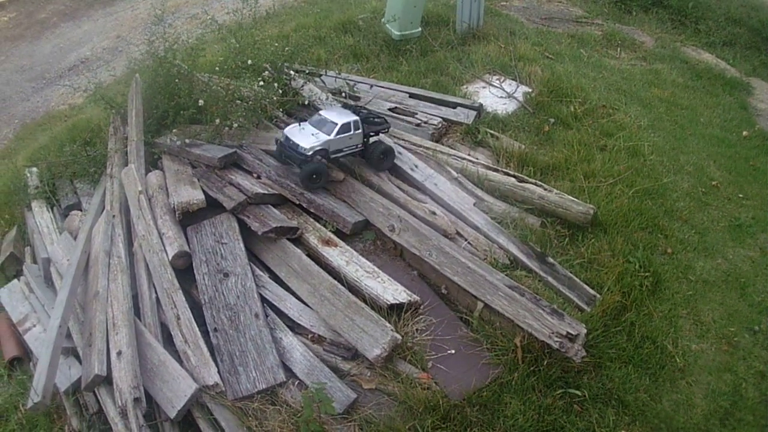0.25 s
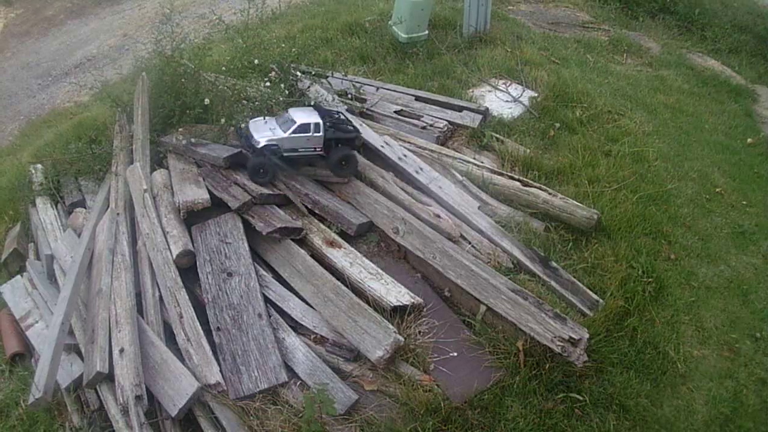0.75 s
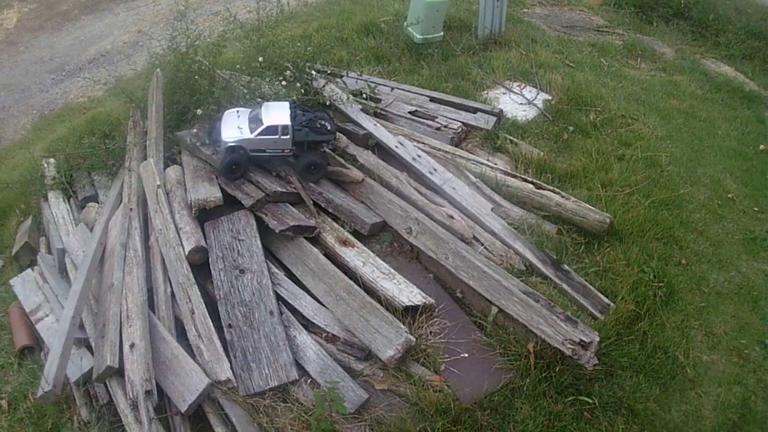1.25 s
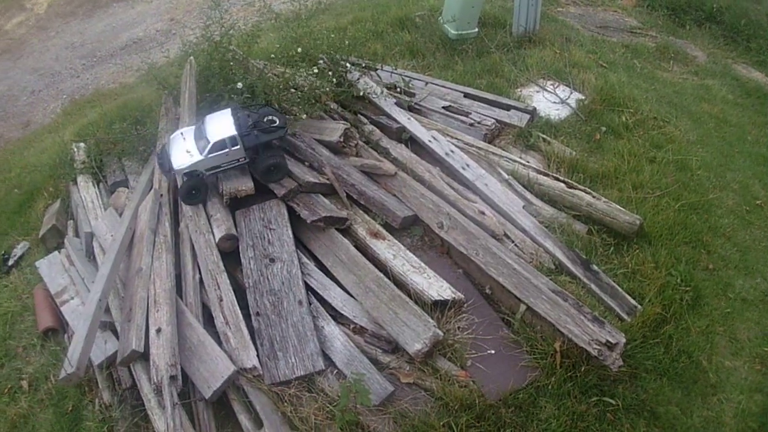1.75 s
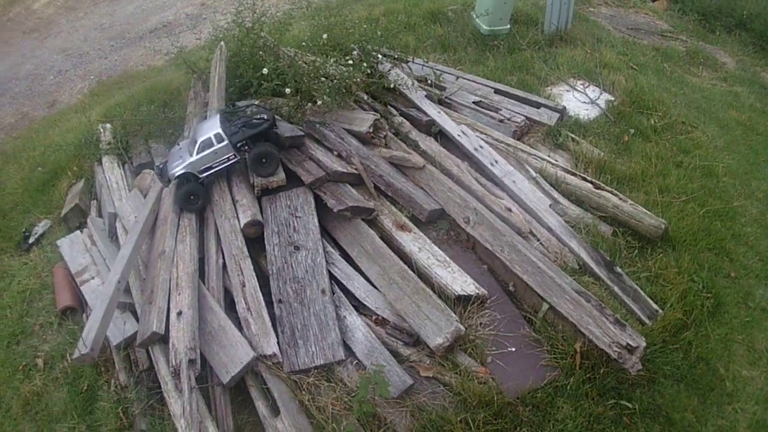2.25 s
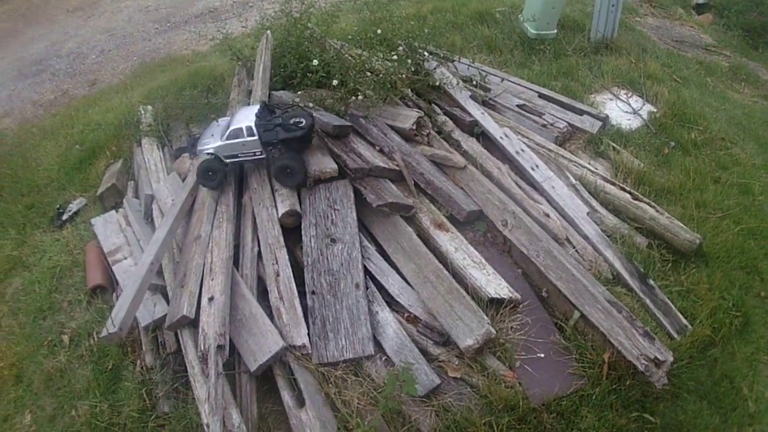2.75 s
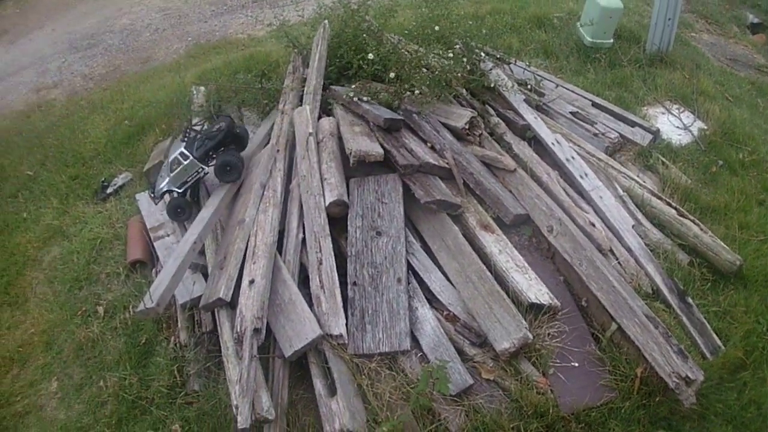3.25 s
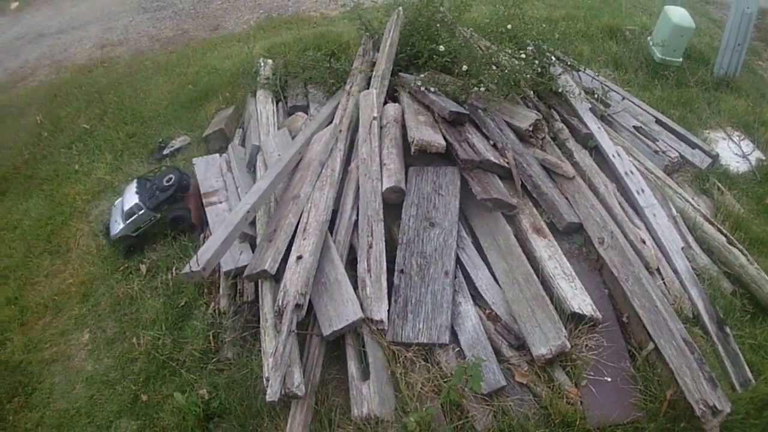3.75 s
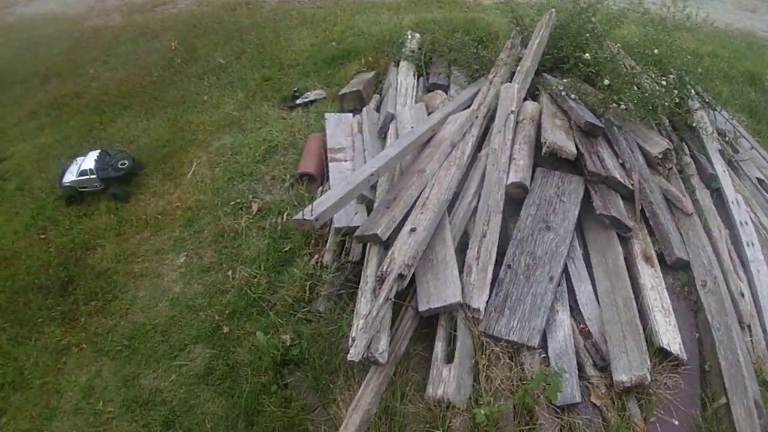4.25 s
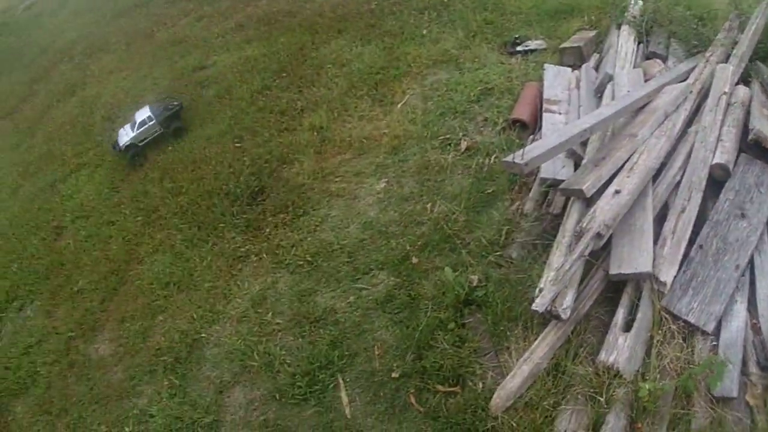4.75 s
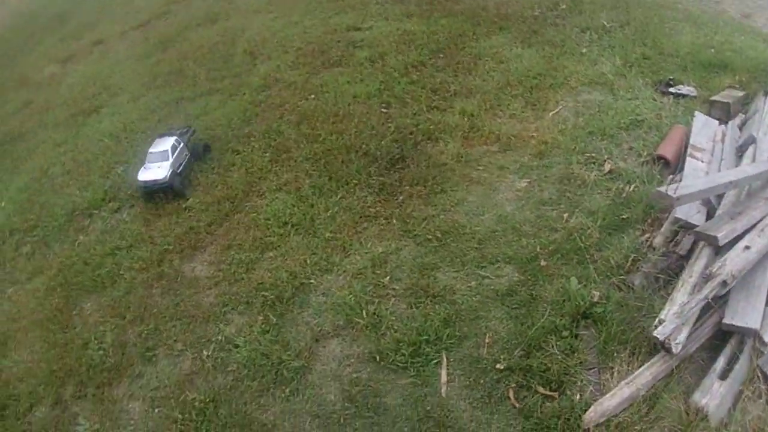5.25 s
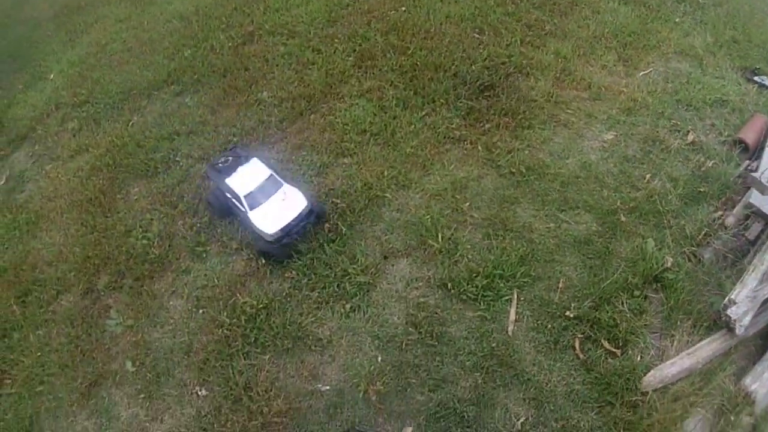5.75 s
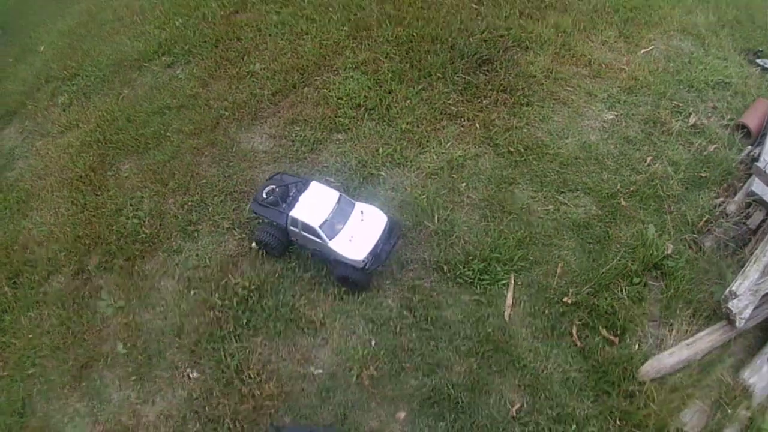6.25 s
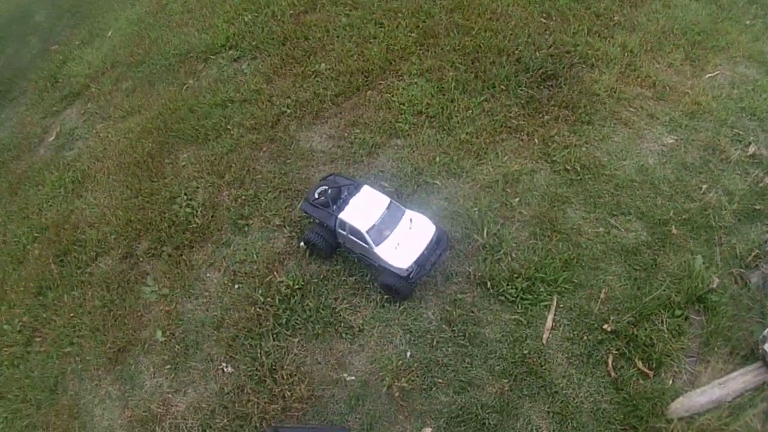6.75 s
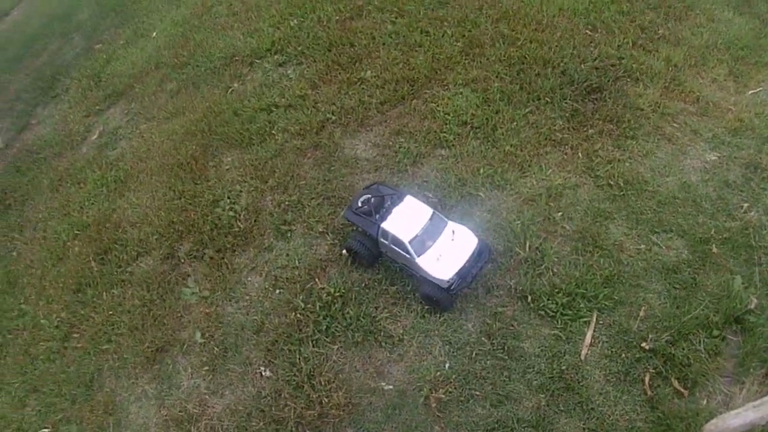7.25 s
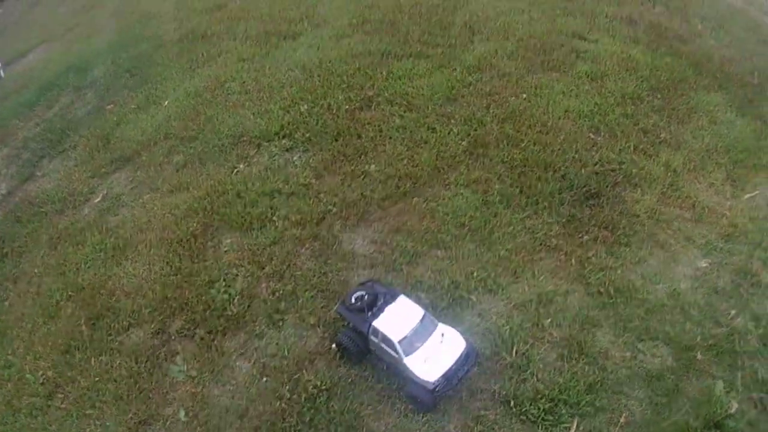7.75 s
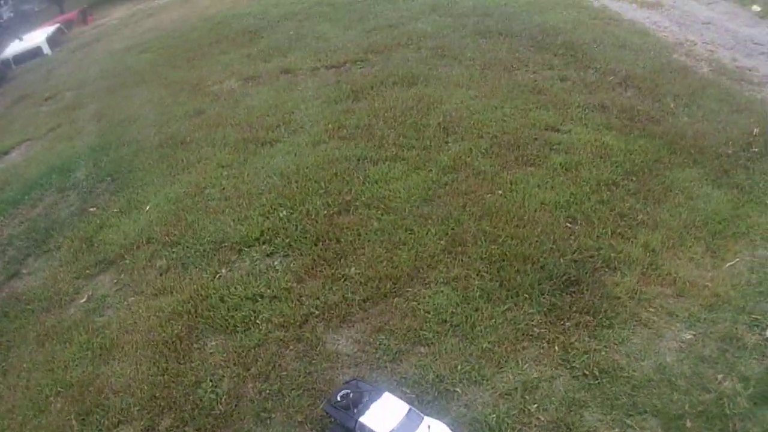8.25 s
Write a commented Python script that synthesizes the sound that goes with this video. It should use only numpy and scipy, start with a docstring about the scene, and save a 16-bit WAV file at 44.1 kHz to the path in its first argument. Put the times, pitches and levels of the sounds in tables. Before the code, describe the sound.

Faint gear whirring and light thuds from a remote-controlled truck on wood and grass, followed by sharp handling knocks and rubbing.

```python
"""A small electric toy truck crawls over old planks, drops onto a lawn and drives up to a camera.
Its meshing gears whine with the throttle, its speed controller sings under load, its steering servo
chirps and ticks, and its tyres strike the wood and excite the damped modes of the chassis.
Once it has stopped, fingers knock on the camera's housing and rub it with stick-slip friction.
Light air rumbles on the microphone throughout, over the faint hiss of a yard."""
import sys
import numpy as np
from scipy import signal
from scipy.fft import rfft, irfft, next_fast_len
from scipy.io import wavfile
from scipy.ndimage import map_coordinates

SR = 44100
rng = np.random.default_rng(int(sys.argv[2]) if len(sys.argv) > 2 else 0)


def wav_record(signal):
    """Record a signal, one row per channel, as 16-bit PCM in the file named by sys.argv[1]."""
    frames = np.transpose(np.atleast_2d(signal))
    bounded = np.clip(frames, -1, 1)
    # unit amplitude maps onto the largest positive 16-bit level
    quanta = np.round(bounded * 32767).astype(np.int16)
    wavfile.write(sys.argv[1], SR, quanta)


N = 374906

# strength of the air on the microphone: (time [s], level [dB])
AIR_LEVELS = [(0, -63), (.8, -55), (1.9, -57.5), (2.45, -51.5), (3.3, -58.5), (3.9, -56.5), (4.8, -66.5),
              (5.4, -57), (6.1, -61.5), (6.4, -66), (8.5, -69.5)]
# spectra of that air and of the quiet yard: (frequency [Hz], relative density [dB])
AIR_SPECTRUM = [(20, 1), (35, 1), (90, 0), (160, -4), (230, -11), (400, -36)]
YARD_SPECTRUM = [(25, 0), (120, -3), (200, -6.5), (380, -11), (480, -13.5), (900, -14), (1600, -27.5),
                 (4900, -29.5), (5800, -56.5)]

# finger slides: (start [s], length [s], drag [dB], scratch [dB], swell over the stroke [dB])
STROKES = [(6.217, .1, -29, -37, -15.5), (6.364, 0.044, -51, -58, 9.5), (6.418, 0.17, -52.5, -54.5, 3.5),
           (6.609, 0.071, -47, -55, -5.5), (6.696, 0.117, -54.5, -66.5, -3.5),
           (6.809, 0.1, -48.5, -59.5, 1.5), (6.912, 0.093, -50.5, -56, 0.5), (7.007, 0.14, -53.5, -68, -6),
           (7.113, .08, -49, -55, 6), (7.191, 0.12, -47, -59, -8.5), (7.306, 0.096, -51, -60, 9.5),
           (7.41, 0.179, -50.5, -54, -1.5), (7.594, 0.043, -36.5, -51.5, 7), (8.063, .21, -49.5, -47, 5),
           (8.268, .038, -47, -54, -4.5), (8.347, .072, -28.5, -39, -11), (8.423, 0.091, -49, -54.5, -3.5)]
# friction spectra of skin on the housing: (frequency [Hz], relative density [dB])
LIGHT_DRAG_SPECTRUM = [(200, -16), (330, -12), (500, -1.5), (640, 2), (710, 0.5), (830, 3.5), (1060, -5),
                       (1280, -5), (1500, -13.5), (1900, -43), (2600, -48)]
FIRM_DRAG_SPECTRUM = [(120, -20.5), (250, -10), (390, 3.5), (590, -11), (690, -10.5), (810, 5.5),
                      (1000, -16.5), (1280, -13.5), (1600, -32.5)]
FINGERTIP_SPECTRUM = [(1200, -25), (1700, -9), (1890, 0), (2100, -3), (2250, -4.5), (2600, -10.5),
                      (2850, -5.5), (3020, 1), (3350, -8), (3680, 0), (4000, -11.5), (4400, 2), (4800, -2),
                      (5200, -17.5), (6000, -20.5)]
PALM_SPECTRUM = [(880, -27), (1500, -10), (1950, -1.5), (2380, -1.5), (2660, -6), (3130, 0), (3390, -5.5),
                 (5050, -8), (5600, -6), (5970, -15), (7760, -55.5), (13100, -120)]
# envelope of a fingertip's slip: (time [s], level [dB])
SQUEAK_LEVELS = [(7.59, -100), (7.598, -63), (7.609, -46), (7.618, -63), (7.634, -32.5), (7.639, -37.5),
                 (7.646, -100)]
# modes that the slip excites: (frequency [Hz], relative level [dB])
SQUEAK_MODES = [(3020, -10.5), (3870, -8.5), (4620, 2.5)]
# finger knocks: (time [s], thud level [dB], thud pitch [Hz], click peak [dB], click centre [Hz])
KNOCKS = [(6.2189, -21, 700, -19, 3500), (6.221, -8, 786, -4, 2250), (6.2224, 1, 452, -11, 1510),
          (6.2328, -18, 694, -24.5, 3800), (6.236, -11.5, 465, -27, 3000), (6.291, -47, 700, -21, 3590),
          (6.414, -32.5, 690, -31.5, 2500), (6.905, -47, 760, -17.5, 3840), (7.5532, -53, 704, -42.5, 3400),
          (7.5637, -20.5, 410, -29.5, 1202), (8.164, -54.5, 608, -27.5, 3155),
          (8.2349, -19.5, 507, -33.5, 1510), (8.2663, -23.5, 500, -36, 2770),
          (8.3494, -14.5, 950, -38.5, 1600), (8.3516, -7.5, 787, -16, 1690), (8.3671, -15, 570, -44, 2500),
          (8.382, -50, 557, -24, 3470)]
# modes of the camera's housing: (frequency [Hz], relative level [dB], t60 [s])
HOUSING_MODES = [(1270, 0.5, 0.016), (1836, 0.5, 0.011), (2460, -2.5, 0.0088), (3020, -5.5, 0.013),
                 (3464, -1, 0.0065), (3840, -5, 0.011), (4350, 1.5, 0.0058), (4430, -3.5, 0.0084)]
# the camera's mount is set swinging: (time [s], starting level [dB])
MOUNT_HUMS = [(6.224, -46.5), (7.6, -53), (8.238, -43), (8.353, -42)]

# landings on planks and turf: (time [s], thud peak [dB], rattle relative to thud [dB])
BUMPS = [(0.111, -36.5, -11), (.190, -35, -9), (0.206, -35.5, -8.5), (.24, -43, -2), (.85, -38.5, -2.5),
         (1.384, -33, -6.5), (1.426, -41, -21), (1.595, -38.5, -15.5), (1.665, -35, -19),
         (2.007, -33.5, -9.5), (2.03, -37, -19), (2.07, -38, -10), (2.613, -32, -11), (2.67, -39, -19),
         (2.755, -34.5, -4.5), (2.87, -52, -2.5), (3.017, -46.5, 3), (3.054, -38, -26), (3.088, -37, -12),
         (3.140, -37, -12), (3.155, -37, -16), (3.24, -46.5, -17.5), (3.49, -47, -14), (3.647, -41.5, -9),
         (3.824, -33.5, -13.5), (3.989, -43, -14), (4.974, -42.5, -4), (5.669, -47, -4),
         (5.955, -42.5, -18)]
# the tyres drop onto turf: (time [s], level [dB], pitch [Hz])
TURF_DROPS = [(3.865, -46, 170), (3.893, -39.5, 240), (3.925, -37.5, 288), (4.139, -52, 140)]
# modes of the truck's parts: (frequency [Hz], relative level [dB], t60 [s])
CHASSIS_MODES = [(169, -10, 0.096), (344, 1.5, 0.064), (450, 2.5, 0.053), (544, -3.5, 0.094),
                 (673, 0.5, 0.04), (835, 3, 0.036), (1060, -14, 0.02), (1486, -6, 0.02)]
SERVO_CASE_MODES = [(1760, 3.5, 0.011), (3460, 5, 0.013), (3620, -8.5, 0.033), (3945, -3, 0.034),
                    (4310, 0, 0.016)]
# ticks of the steering servo: (time [s], peak [dB])
SERVO_TICKS = [(.217, -41.5), (0.651, -43.5), (0.953, -42), (1.975, -40.5), (2.459, -49), (5.754, -32.5),
               (5.777, -39), (5.798, -36.5), (5.813, -42.5), (5.829, -44), (5.839, -42.5), (5.852, -45)]
# swings of the servo: (time [s], starting pitch [Hz], level [dB])
SERVO_SWINGS = [(.175, 3750, -55.5), (.215, 3840, -58), (.296, 3310, -58), (.68, 3980, -60),
                (0.869, 5500, -66), (1.256, 3210, -56.5), (2.55, 3130, -59), (2.645, 3140, -50),
                (3.655, 3800, -61), (3.74, 3900, -71), (3.94, 3960, -66), (4.095, 4000, -70),
                (5.53, 4200, -64)]
# the motor strains at low throttle: (start [s], length [s], tone [dB], drop in tooth hiss [dB])
CRAWLS = [(0, 0.1, -54.5, 0), (0.963, .27, -52, 4), (1.227, .3, -58.5, 1), (1.711, 0.17, -50.5, 4.5),
          (1.902, 0.29, -56.5, 2), (2.227, .2, -54, 10.5), (2.436, 0.17, -55, -2.5), (3.264, 0.29, -63, 1)]
# the truck's effort and nearness: (time [s], gearbox [dB], tooth hiss [dB], tyres [dB])
DRIVE_LEVELS = [(0, -54.5, -65.5, -57), (.68, -55, -66.5, -57), (.94, -48, -58, -52), (1.06, -57, -70, -62),
                (1.42, -47.5, -59.5, -52), (1.56, -57.5, -66.5, -52.5), (1.93, -52, -65.5, -63.5),
                (2.04, -50, -64, -51), (2.45, -53.5, -73, -58.5), (2.68, -45, -54, -42.5),
                (2.93, -58, -71.5, -60.5), (3.22, -62.5, -76.5, -63), (3.57, -56, -65.5, -60),
                (4.1, -63.5, -72, -59), (4.7, -61.5, -69, -69.5), (5, -61, -65, -60.5),
                (5.8, -58, -64, -54.5), (6.05, -62.5, -78.5, -56), (6.19, -74, -80, -70)]
# spectra of the running gear: (frequency [Hz], relative density [dB])
GEARBOX_SPECTRUM = [(350, -32), (600, 2), (686, 0), (911, 4), (1070, 5), (1170, -1), (1500, -6),
                    (1740, -13.5), (2010, -25), (2400, -26.5), (3120, -56), (5280, -120)]
TOOTH_SPECTRUM = [(1500, -22.5), (2000, -3.5), (2400, -8.5), (2750, -7.5), (2980, -2), (3250, -11.5),
                  (3550, -1.5), (3950, -6.5), (4300, -8.5), (4900, -16), (5500, -12.5), (6100, -42)]
TYRE_SPECTRUM = [(110, -30.5), (180, -13), (269, -6.5), (317, -0.5), (403, 1), (488, -4), (690, -12.5),
                 (750, -5.5), (980, -36.5), (1650, -120)]
# resonances of the drivetrain: (frequency [Hz], relative level [dB])
DRIVE_RESONANCES = [(2050, -10), (3010, -2), (3850, -6)]
# throttle blips: (time of top [s], run-up [s], run-down [s], top pitch [Hz], last pitch [Hz],
# level before the gear cover [dB])
REVS = [(.035, .035, 0.053, 1240, 980, -62.5), (.14, .045, 0.046, 1416, 1300, -59.5),
        (.318, .015, 0.043, 1580, 1080, -55), (.445, .03, 0.094, 1370, 764, -49.5),
        (.585, .05, 0.049, 1250, 1000, -53), (.69, .04, 0.036, 1240, 1140, -58),
        (.765, .045, 0.045, 1560, 1040, -55), (.85, .04, 0.042, 1420, 1100, -56),
        (.935, .05, .04, 1970, 1100, -62.5), (1.278, .04, .04, 1504, 1380, -53),
        (1.365, .06, 0.063, 2035, 1400, -56.5), (1.48, .05, 0.082, 1080, 1050, -53),
        (1.62, .05, 0.097, 1130, 790, -55.5), (1.82, .07, 0.066, 904, 804, -55),
        (1.95, .06, 0.049, 1199, 1105, -57.5), (2.13, .015, 0.078, 1101, 757, -52),
        (2.555, .055, .02, 1540, 1500, -52), (2.74, .06, .05, 1530, 1350, -59),
        (3.06, .02, .1, 1000, 696, -59.5), (5, .7, 0.69, 1079, 1050, -70),
        (5.885, .04, 0.053, 1264, 935, -54.5), (6.01, .04, 0.074, 1110, 996, -61)]

REGRIP_START_S, REGRIP_END_S = 8.0, 8.33  # the hand closes on the housing
CRAWL_ATTACK_S, CRAWL_T60_S = 0.011, 0.18
SWITCH_HZ, LUG_HZ, MOUNT_HZ = 977, 155, 397
STOP_S = 6.19  # the truck comes to rest
REV_SAG, BRAKE_DB = .2, 1.5  # a blip starts this share below its top pitch; slowing gears are louder
COVER_HZ = 1750  # the gear cover muffles revs above this pitch


def amp(db):
    """Amplitude ratio of a level in decibels."""
    return 10 ** (np.asarray(db) / 20)


def unit(x):
    """Normalisation to rms 1."""
    return x / np.sqrt(np.mean(x ** 2) + 1e-20)


def curves(rows):
    """Linear interpolation of each column after the time, one value a sample."""
    times, *columns = np.transpose(rows)
    return [np.interp(np.arange(N) / SR, times, column) for column in columns]


def wobble(rate, size=N):
    """Random modulation: a smooth curve with rate knots a second."""
    return map_coordinates(rng.standard_normal(int(N * rate / SR) + 4), [np.arange(size) * rate / SR])


def gate(start, length, attack, t60):
    """An envelope with a linear rise, a hold and an exponential decay."""
    t = np.arange(N) / SR - start
    return np.clip(t / attack, 0, 1) * amp(-60 * np.clip((t - length) / t60, 0, 2))


def filtered(x, response):
    """Linear filtering: the spectrum of x times a frequency response."""
    size = next_fast_len(N + SR // 2)
    return irfft(rfft(x, size) * response(np.fft.rfftfreq(size, 1 / SR)), size)[:N]


def coloured(x, spectrum):
    """Spectral shaping of x by (frequency [Hz], level [dB]) points, at rms 1."""
    points_hz, db = np.transpose(spectrum)
    return unit(filtered(x, lambda hz: amp(np.interp(np.log(hz + 1), np.log(points_hz + 1), db))))


def grains(rate, spread_db, bed_db):
    """Shot noise: tiny random impacts of uneven size on a bed of white noise."""
    hits = (rng.random(N) < rate / SR) * rng.standard_normal(N)
    hits *= amp(spread_db * np.clip(rng.standard_normal(N), -2, 2))
    return unit(unit(hits) + amp(bed_db) * rng.standard_normal(N))


def ring(modes, attack, crack_db, crack_t60):
    """Free vibration after a blow: damped modes and a dying crack of noise, at peak 1."""
    t = np.arange(SR // 5) / SR
    tones = sum(amp(db + rng.normal(0, 2) - 60 * t / t60) * np.sin(2 * np.pi * (hz * t + rng.random()))
                for hz, db, t60 in modes)
    crack = amp(crack_db - 60 * t / crack_t60) * rng.standard_normal(len(t))
    blow = (tones + crack) * (1 - np.exp(-t / attack))
    return blow / np.abs(blow).max()


def thud(hz):
    """Heavy damping: a soft push swells within its first cycle and is gone after a few."""
    cycles = hz * np.arange(SR // 10) / SR
    rise = cycles / 0.7
    return -(rise * np.exp(1 - rise)) ** 2 * np.sin(2 * np.pi * cycles)


def add(track, start, sound):
    """Superposition of a sound on a track, from start in seconds."""
    part = track[round(start * SR):][:len(sound)]
    part += sound[:len(part)]


def yard():
    """Pressure fluctuations of light air rumble on the microphone over a faint outdoor hiss."""
    air_gain = amp(curves(AIR_LEVELS)[0] + 1.3 * wobble(8.6))
    rumble = air_gain * coloured(rng.standard_normal(N), AIR_SPECTRUM)
    return rumble + amp(-64.5) * coloured(rng.standard_normal(N), YARD_SPECTRUM)


def rubbing():
    """Stick-slip friction: skin catches densely on the housing; a firm press drags lower."""
    t = np.arange(N) / SR
    drag_gain, scratch_gain = np.zeros((2, N))
    for start, length, drag_db, scratch_db, swell_db in STROKES:
        swell = amp(swell_db * np.clip((t - start) / length, 0, 1))
        stroke = gate(start, length, attack=0.012, t60=0.061) * swell
        drag_gain += amp(drag_db) * stroke
        scratch_gain += amp(scratch_db) * stroke
    slips = grains(rate=1400, spread_db=2, bed_db=2)
    firm_share = drag_gain ** 2 / (drag_gain ** 2 + amp(-38) ** 2)
    drag = np.sqrt(1 - firm_share) * coloured(slips, LIGHT_DRAG_SPECTRUM)
    drag += np.sqrt(firm_share) * coloured(rng.standard_normal(N), FIRM_DRAG_SPECTRUM)
    regrip = (t > REGRIP_START_S) & (t < REGRIP_END_S)
    scratch = np.where(regrip, coloured(slips, PALM_SPECTRUM), coloured(slips, FINGERTIP_SPECTRUM))
    return drag_gain * amp(1.8 * wobble(50)) * drag + scratch_gain * amp(1.203 * wobble(70)) * scratch


def squeak():
    """Frictional excitation: a fast slip makes the housing's upper modes sing in rough bursts."""
    t = np.arange(N) / SR
    modes = sum(amp(db) * np.sin(2 * np.pi * hz * t + 0.88 * wobble(500)) for hz, db in SQUEAK_MODES)
    return amp(curves(SQUEAK_LEVELS)[0] + 3.8 * wobble(300)) * unit(modes)


def knocks():
    """Impulse response: a finger makes the housing thud and click; at times the mount hums on."""
    out, t = np.zeros(N), np.arange(SR // 2) / SR
    for start, thud_db, thud_hz, click_db, click_hz in KNOCKS:
        # where and how hard the finger lands decides which modes speak most
        modes = [(hz, db - 6 * abs(np.log2(hz / click_hz)), t60) for hz, db, t60 in HOUSING_MODES]
        add(out, start, amp(thud_db) * thud(thud_hz))
        add(out, start, amp(click_db) * ring(modes, attack=0.000071, crack_db=-13, crack_t60=0.016))
    for start, db in MOUNT_HUMS:
        add(out, start, amp(db - 60 * t / .6) * np.sin(2 * np.pi * MOUNT_HZ * (start + t)))
    return out


def lugs():
    """Periodic impacts: at speed the tread lugs strike the lawn and fuse into a low, rough hum."""
    phase = 2 * np.pi * LUG_HZ * np.arange(N) / SR + 0.69 * wobble(32)
    return amp(-65) * gate(start=4.15, length=0.48, attack=0.11, t60=0.46) * unit(np.sin(phase))


def bumps():
    """Impact excitation: soft tyres thud the chassis, loose plastic rattles, the servo ticks."""
    out = np.zeros(N)
    for start, db, rattle_db in BUMPS:
        chassis = ring(CHASSIS_MODES, attack=0.00085, crack_db=-26.5, crack_t60=.033)
        rattle = ring(SERVO_CASE_MODES, attack=0.0011, crack_db=8, crack_t60=.032)
        add(out, start, amp(db) * (chassis + amp(rattle_db) * rattle))
    for start, db, hz in TURF_DROPS:
        add(out, start, amp(db) * thud(hz))
    for start, db in SERVO_TICKS:
        add(out, start, amp(db) * ring(SERVO_CASE_MODES, attack=.0008, crack_db=1.5, crack_t60=.035))
    return out


def steering():
    """Pitch follows rotation speed: the servo runs down in each swing with a raspy falling chirp."""
    out, t = np.zeros(N), np.arange(SR // 20) / SR
    for start, hz, db in SERVO_SWINGS:
        phase = 2 * np.pi * np.cumsum(hz * (1 - 1.79 * t)) / SR + 0.73 * wobble(600, size=len(t))
        add(out, start, amp(db) * np.hanning(len(t)) * unit(np.sin(phase)))
    return out


def controller():
    """Periodic switching: the speed controller sings at one pitch while the motor strains."""
    level = sum(amp(db) * gate(start, length, CRAWL_ATTACK_S, CRAWL_T60_S)
                for start, length, db, _ in CRAWLS)
    phase = 2 * np.pi * SWITCH_HZ * np.arange(N) / SR + .25 * wobble(56)
    tone = unit(np.sin(phase) + amp(-36) * np.sin(2 * phase) + amp(-34) * np.sin(3 * phase))
    return level * amp(1.6 * wobble(30)) * tone


def drivetrain():
    """Forced vibration: ticking teeth drive the gearbox's resonances as the tread patters along."""
    box_db, teeth_db, tyre_db = curves(DRIVE_LEVELS)
    drop_db = sum(db * gate(start, length, CRAWL_ATTACK_S, CRAWL_T60_S)
                  for start, length, _, db in CRAWLS)
    load_db = 1.1 * wobble(14)
    teeth_gain = amp(teeth_db - drop_db + load_db)
    box_gain = amp(box_db - 0.57 * drop_db + load_db)  # the gearbox takes only part of a crawl's drop
    box = coloured(grains(rate=900, spread_db=2.5, bed_db=0), GEARBOX_SPECTRUM)
    teeth = coloured(grains(rate=620, spread_db=8.5, bed_db=5), TOOTH_SPECTRUM)
    singing = 0
    for hz, db in DRIVE_RESONANCES:  # each wavers and flares
        phase = 2 * np.pi * np.cumsum(hz * (1 + .026 * wobble(12))) / SR + .9 * wobble(300)
        singing += amp(db + 4 * wobble(22)) * np.sin(phase)
    tread_gain = amp(tyre_db + 1.7 * wobble(18))
    tread = coloured(grains(rate=320, spread_db=8.5, bed_db=4), TYRE_SPECTRUM)
    gears = box_gain * box + teeth_gain * (teeth + amp(-8) * unit(singing))
    rolling = np.arange(N) < STOP_S * SR
    return rolling * (gears + tread_gain * tread)


def gear_whine():
    """Gear-mesh tone: with each throttle blip the tooth rate glides up, then falls ever faster."""
    out = np.zeros(N)
    for top_s, up, down, top_hz, last_hz, db in REVS:
        size = round((up + down) * SR)
        t = np.arange(size) / SR - up
        progress = np.where(t < 0, t / up, t / down)  # from -1 through the top to 1
        hz = top_hz - progress ** 2 * np.where(t < 0, REV_SAG * top_hz, top_hz - last_hz)
        wavering_hz = hz * (1 + .019 * wobble(170, size))
        phase = 2 * np.pi * np.cumsum(wavering_hz) / SR + .52 * wobble(450, size)
        fundamental = unit(np.sin(phase)) / np.sqrt(1 + (hz / COVER_HZ) ** 8)
        # overtones only speak where they cross the gearbox's resonance
        overtones = sum(np.sin(k * phase) / (1 + ((k * hz - 3050) / 220) ** 2) for k in (2, 3))
        level = amp(db + BRAKE_DB * progress + 2.6 * wobble(110, size)) * signal.windows.tukey(size, .25)
        add(out, max(top_s - up, 0), level * (fundamental + amp(-12) * overtones))
    return out


def scene():
    """Superposition of the truck, the fingers and the yard in one channel."""
    truck = gear_whine() + controller() + steering() + drivetrain() + lugs() + bumps()
    return (truck + knocks() + rubbing() + squeak() + yard())[None]


def record(dry):
    """Saturation: the hardest knock overloads the narrow-band microphone and spits treble."""
    narrow = filtered(dry[0], lambda hz: 1 / np.sqrt(1 + (hz / 5300) ** 32) * (hz < 6126))
    saturated = narrow / (1 + np.abs(narrow / .72) ** 14) ** (1 / 14)
    smoothed = filtered(saturated, lambda hz: 1 / np.sqrt(1 + (hz / 12500) ** 12) * (hz < 15800))
    return smoothed[None] + .0048  # the microphone's slight offset


dry = scene()
out = record(dry)
wav_record(out)
```